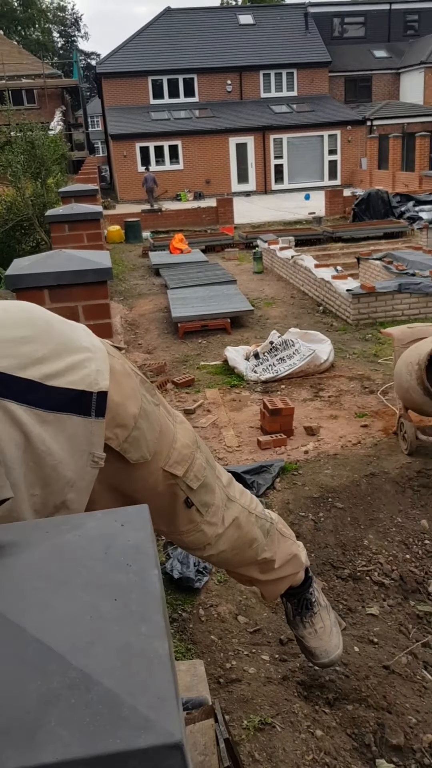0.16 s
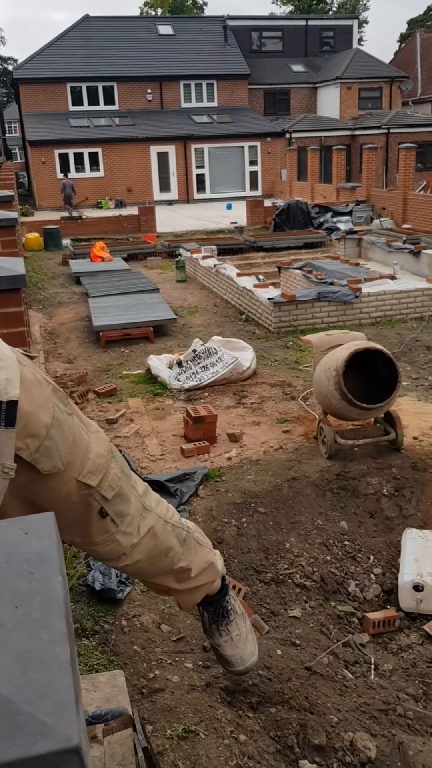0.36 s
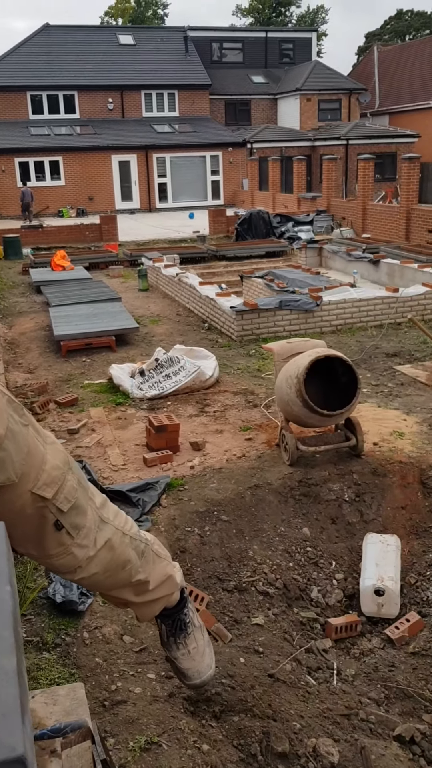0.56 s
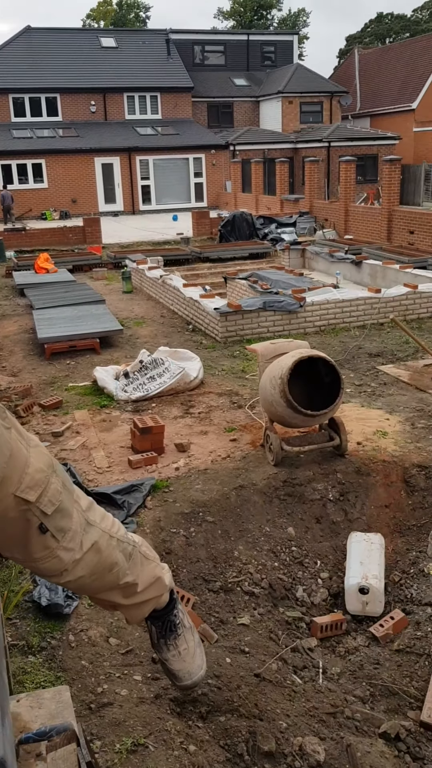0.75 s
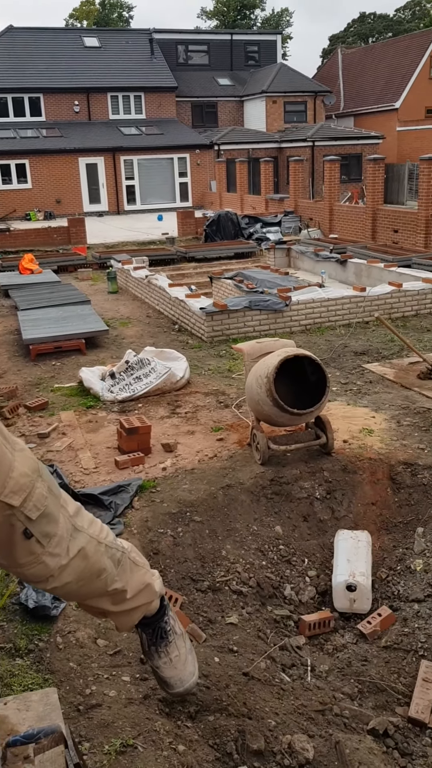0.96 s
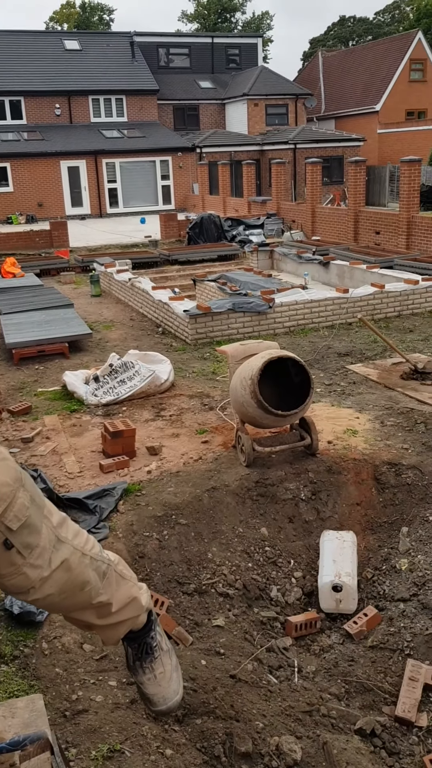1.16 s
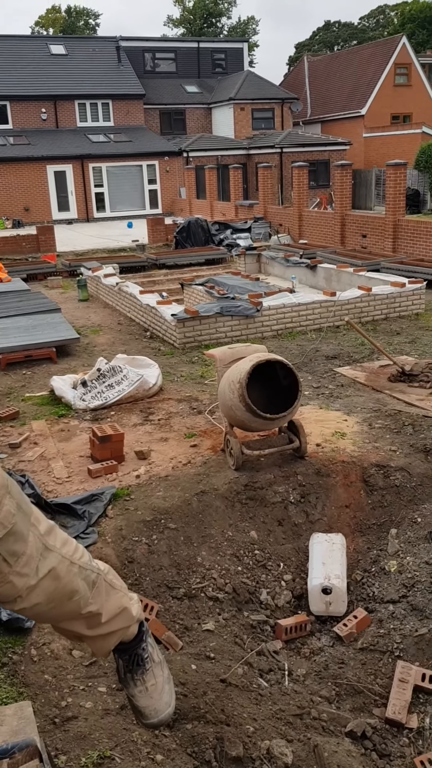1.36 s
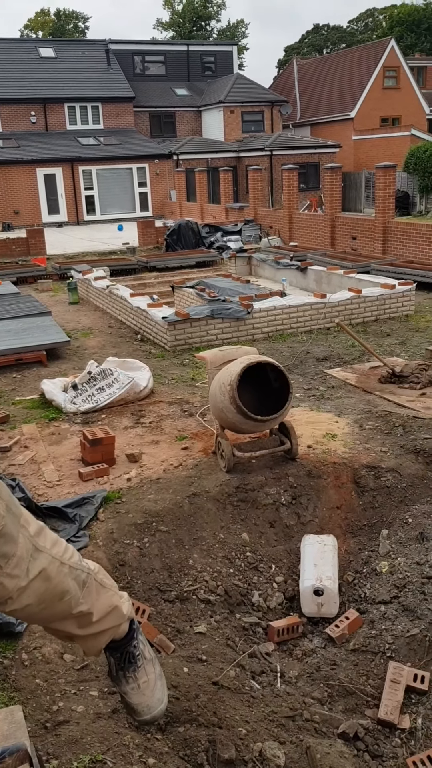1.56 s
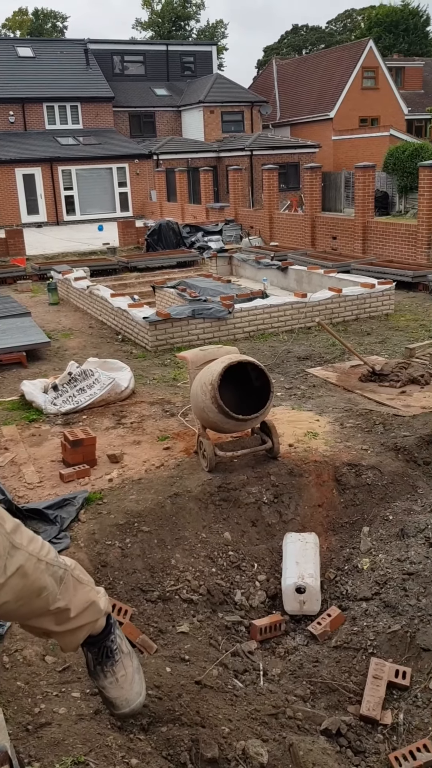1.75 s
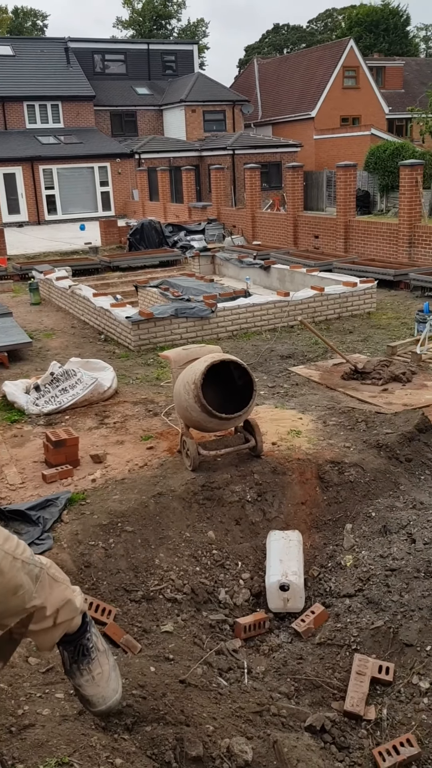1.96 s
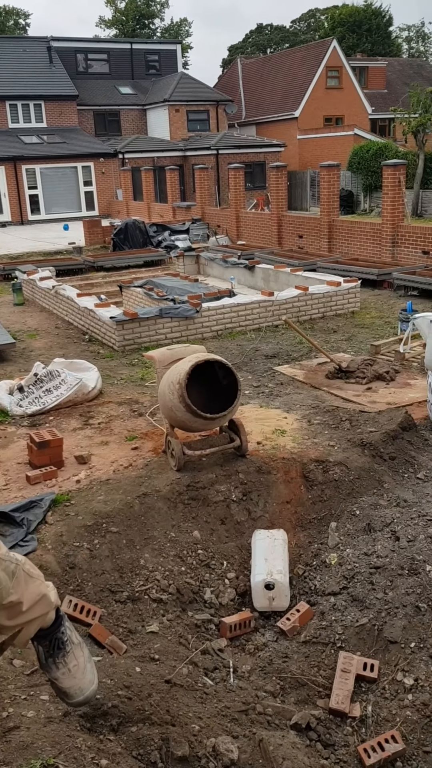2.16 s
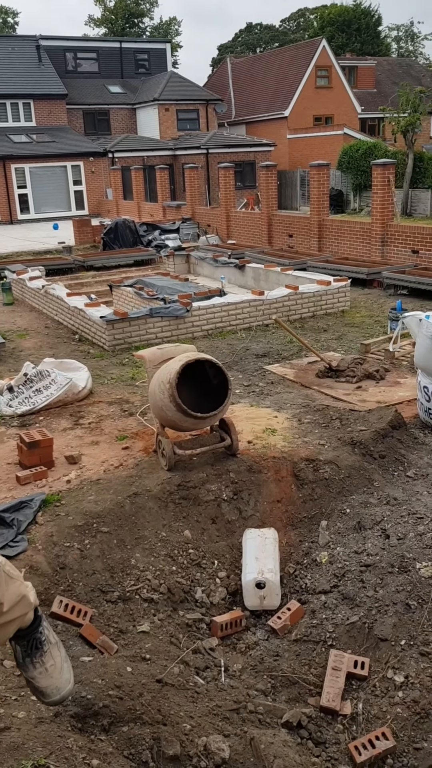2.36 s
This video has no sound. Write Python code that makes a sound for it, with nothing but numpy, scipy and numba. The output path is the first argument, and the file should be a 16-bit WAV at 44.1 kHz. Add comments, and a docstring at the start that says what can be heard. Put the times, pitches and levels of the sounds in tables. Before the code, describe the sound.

A rough stone slab scrapes and catches on a brick pillar, followed by faint rubs and taps

```python
"""One long gritty scrape of a concrete cap on a brick pillar swells and catches, close to the microphone.
A gloved hand works the cap: a touch comes before the scrape, soft rubs and small knocks follow it.
Cracking sand grains are random clicks, filtered into rasp, hiss and grinding; they also ring the slab's edge.
House fronts add a faint echo, made of fading noise. Behind lie a low outdoor rumble of filtered noise
and a thin, high, far whistle like a small bird's, made of wavering sine tones."""
import sys
import numpy as np
from scipy import signal
from scipy.fft import rfft, irfft
from scipy.io import wavfile
from numba import njit

SR = 44100
rng = np.random.default_rng(int(sys.argv[2]) if len(sys.argv) > 2 else 0)


def persist_wave(psi):
    """Save psi, clipped to +-1, as 16-bit WAV."""
    counts = np.round(np.clip(psi, -1, 1) * 32767).astype(np.int16)
    wavfile.write(sys.argv[1], SR, np.atleast_2d(counts).T)


N = 110250  # samples: 2.5 s

# Course of the long scrape, each layer before its trim below:
# time_s, edge_db, rasp_db, hiss_db, grinding_db
SCRAPE_LEVELS = [(0.245, -67, -76, -72, -79), (0.267, -70, -60, -58.5, -61), (0.309, -57, -50, -52, -55.5),
                 (0.341, -67, -50, -57, -64), (0.401, -51.5, -47, -50.5, -46),
                 (0.483, -50.5, -43, -45.5, -58), (0.521, -46, -44, -46.5, -53),
                 (0.533, -51, -39.5, -44, -58), (0.563, -38, -43.5, -46.5, -59),
                 (0.647, -46, -51, -48, -53.5), (0.72, -69.5, -74, -68, -65.5)]
EDGE_TRIM_DB, RASP_TRIM_DB, HISS_TRIM_DB, GRINDING_TRIM_DB = 3, 1.5, 0.5, 5
# Centre of the rasp, which rises with the speed of the slide: time_s, centre_hz
RASP_PITCH = [(.28, 3800), (.37, 3750), (.46, 3940), (.535, 4230), (.6, 4190), (.68, 4220)]
RASP_WIDTH_HZ = 1070.0
# Ways the slab's edge can ring, relative levels: pitch_hz, level_db, fade_by_60_db_s
EDGE_MODES = [(1320, -24, 0.064), (2170, -27, 0.058), (2477, -13, 0.067), (2620, -12, 0.082),
              (2743, -2, 0.057), (2700, -8.5, 0.085), (2890, -9, 0.036), (3130, -9, 0.031),
              (3970, -37, 0.16), (4000, -56, .06), (4840, -20, 0.05), (7740, -22, .015)]

# Tone colours of the grit, relative levels: pitch_hz, level_db
GRINDING_COLOUR = [(150, -29), (400, -1), (900, -2.5), (1500, -1), (2100, -2.5), (3200, 5), (4500, -5),
                   (5700, -10.5), (6400, -33), (16000, -35)]  # broad grinding
HISS_COLOUR = [(1500, -10), (4000, -5), (5600, 2), (6500, -0.5), (7500, 8.5), (8300, -4), (9300, -1),
               (12000, 2.5), (13500, -0.5), (16000, -4)]  # fine hiss
THUD_COLOUR = [(60, -10), (130, -12.5), (350, 4.5), (600, -1.5), (950, -3), (1170, 2), (1400, -8),
               (1800, -7.5), (3500, -55), (16000, -76)]  # dull thud or low brush
CRACK_COLOUR = [(300, -91), (1500, 6.5), (2300, -3), (3300, 5), (4400, 3.5), (5400, -2.5), (6400, -25),
                (16000, -62)]  # crack or rasp of a rub or knock

# Soft rubs of the glove: start_s, length_s, brush_db, edge_db, rasp_db, hiss_db
RUB_STROKES = [(1.223, 0.056, -62, -74, -59.5, -64), (1.3, 0.043, -64.5, -82, -67.5, -74),
               (1.569, 0.065, -60, -53.5, -60, -65), (1.647, 0.071, -63, -66, -63.5, -73),
               (1.72, 0.095, -77, -111, -74.5, -66.5), (2.239, 0.02, -78, -73, -67.5, -72.5),
               (2.366, 0.011, -59, -93, -66, -68.5)]
RUB_ATTACK_S, RUB_RELEASE_S = 0.0087, 0.053
# Knocks and catches, crack before its trim below:
# start_s, fade_by_60_db_s, thud_db, edge_db, crack_db, hiss_db, tick_pitch_hz
KNOCK_EVENTS = [(0.0437, 0.041, -44.5, -68, -65.5, -92, 4300), (.2262, 0.086, -46.5, -54, -42.5, -46, 4040),
                (.469, 0.015, -65, -55, -50, -40, 4280), (.4785, 0.018, -67, -41, -29, -51, 4150),
                (.5328, 0.016, -63.5, -53, -31, -54, 4430), (0.5352, 0.014, -75, -24.5, -46, -53, 4300),
                (.5425, 0.032, -68, -50, -30.5, -54, 4100), (0.5532, 0.028, -69, -31, -32, -66, 2450),
                (0.5701, 0.014, -50, -34, -33, -54, 2500), (0.591, 0.024, -76, -58, -54, -38.5, 4200),
                (0.63, 0.032, -59, -44, -48, -46, 4160), (1.203, 0.1, -45.5, -65, -53.5, -65, 4400),
                (1.2484, 0.078, -47, -76, -56, -70, 4700), (1.298, .05, -45, -66, -55.5, -55.5, 4560),
                (1.3255, 0.031, -70, -58, -55, -72, 2400), (1.4465, 0.024, -64, -76, -57, -80, 4400),
                (1.5821, 0.057, -45, -59, -53.5, -68, 3000),
                (1.7137, 0.062, -44.5, -47.5, -46.5, -68, 2870), (1.732, 0.1, -67, -70, -53.5, -50.5, 4350),
                (2.229, 0.069, -59, -71, -52, -61.5, 3150), (2.261, 0.026, -73, -72, -56, -72, 3100),
                (2.385, 0.026, -58, -74, -59, -68, 4580)]
KNOCK_ATTACK_S, TICK_WIDTH_HZ, CRACK_TRIM_DB = 0.00084, 480.0, -4.5

GRAINS_PER_S, GRAIN_SPREAD_DB = 6500, 2.5
JUDDER_STEPS_PER_S, JUDDER_DB = 170.9, 1.45
# Share of the power that reaches both microphone ports alike, 0 to 1
GRIT_SHARED, EDGE_SHARED = 0.33, 0.57

# Left minus right for sounds at the pillar: pitch_hz, difference_db
PILLAR_BALANCE = [(100, -32), (800, 8.5), (1300, -5), (2000, 1), (2750, 1), (4100, 2), (5100, -11.5),
                  (5800, -16), (6500, 4.5), (7500, -1.5), (8800, 16), (10200, 9), (12400, 6), (14500, 12.5),
                  (16000, 21)]
# Tone of the echo: pitch_hz, level_db
ECHO_TONE = [(100, -30), (600, 11), (1800, 8), (2700, -1.5), (5000, 3), (16000, 0)]
ECHO_FADE_BY_60_DB_S, ECHO_DB, LEFT_LAG_S = 0.76, -19.5, 0.0004645

# Notes of the far whistle: start_s, length_s, first_pitch_hz, last_pitch_hz, level_db
WHISTLE_NOTES = [(1.277, 0.18, 8100, 7850, -76), (1.44, 0.09, 8100, 7900, -79),
                 (1.516, 0.13, 7900, 7600, -70.5), (1.76, 0.14, 7950, 7900, -82),
                 (2.275, 0.11, 4500, 4670, -75)]
WHISTLE_WAVER, WHISTLE_FLUTTER_DB = 0.014, 4.5  # waver is a fraction of the pitch

# Tone of the outdoor rumble, relative levels: pitch_hz, level_db
OUTDOOR_COLOUR = [(15, -37), (25, -8), (49, 2), (62, -2), (82, -4.5), (113, -0.5), (173, -10), (198, -9.5),
                  (289, -8), (322, -10), (421, -15.5), (495, -14.5), (537, -18.5), (666, -17.5),
                  (804, -15.5), (919, -18.5), (997, -17.5), (1200, -18.5), (1620, -26.5), (2300, -41),
                  (5280, -39), (7500, -50.5), (15500, -42)]
# How much of the rumble differs between left and right: pitch_hz, side_to_mid_db
OUTDOOR_SIDE = [(30, -22), (100, -18), (300, -14), (700, -8), (1400, -4), (4000, 2), (16000, -1)]
OUTDOOR_DB, OUTDOOR_PAN_DB = -52, 1.7
TOP_HZ = 15800


def scrape():
    """The slab slides and judders: cracking grit gives rasp, hiss and grinding, and rings the edge."""
    t = times()
    first_s, last_s = SCRAPE_LEVELS[0][0], SCRAPE_LEVELS[-1][0]
    fade_in = np.clip((t - first_s) / .005, 0, 1)
    fade_out = np.exp(-np.maximum(t - last_s, 0) / .02)
    force = fade_in * fade_out * judder()
    edge_level, rasp_level, hiss_level, grinding_level = (
        force * undb(curve(SCRAPE_LEVELS, column)) for column in range(1, 5))

    centre = curve(RASP_PITCH)
    rasp = band_pass(band_pass(grit(), centre, RASP_WIDTH_HZ), centre, RASP_WIDTH_HZ)
    return (undb(EDGE_TRIM_DB) * edge(edge_level * grit(EDGE_SHARED))
            + undb(RASP_TRIM_DB) * rasp_level * unit(rasp)
            + undb(GRINDING_TRIM_DB) * grinding_level * coloured_grit(GRINDING_COLOUR)
            + undb(HISS_TRIM_DB) * hiss_level * coloured_grit(HISS_COLOUR))


def rubs():
    """Short strokes of the glove press the grit softly: attack, hold, release, with a slight judder."""
    t, envelopes = times(), 0
    for start, length, *levels_db in RUB_STROKES:
        attack = np.clip((t - start) / RUB_ATTACK_S, 0, 1)
        release = np.exp(-np.maximum(t - start - length, 0) / RUB_RELEASE_S)
        envelopes = envelopes + undb(levels_db)[:, None] * attack * release
    return contact(*envelopes) * judder()


def knocks():
    """Each knock or catch crushes a quickly fading burst of grit and ticks at its own pitch."""
    t, envelopes = times(), 0
    tick_pitch = np.full(N, float(KNOCK_EVENTS[0][-1]))
    for start, fade_s, *levels_db, pitch_hz in KNOCK_EVENTS:
        age = np.maximum(t - start, 0)
        shape = np.minimum(age / KNOCK_ATTACK_S, 1) * undb(-60 * age / fade_s)
        envelopes = envelopes + undb(levels_db)[:, None] * shape
        tick_pitch = np.where(t >= start, pitch_hz, tick_pitch)  # held until the next knock
    thud, edge_level, crack, hiss = envelopes
    tick = unit(band_pass(grit(), tick_pitch, TICK_WIDTH_HZ))
    return contact(thud, edge_level, undb(CRACK_TRIM_DB) * crack, hiss) + crack * tick


def contact(thud, edge_level, crack, hiss):
    """Pressed grit sounds in four layers: dull thud, ringing edge, crack and fine hiss."""
    return (thud * coloured_grit(THUD_COLOUR)
            + edge(edge_level * grit(EDGE_SHARED))
            + crack * coloured_grit(CRACK_COLOUR)
            + hiss * coloured_grit(HISS_COLOUR))


def edge(force):
    """The slab's edge, struck by grains, rings as a sum of fading sine tones."""
    t = times()[:SR // 4]
    response = 0
    for pitch_hz, level_db, fade_s in EDGE_MODES:
        response = response + undb(level_db - 60 * t / fade_s) * np.sin(2 * np.pi * pitch_hz * t)
    return ring(force, unit_energy(response))


def grit(shared=GRIT_SHARED):
    """Sand grains break in dense random clicks of uneven size, partly shared by the two ports."""
    hit = rng.random((3, N)) < GRAINS_PER_S / SR
    size = undb(GRAIN_SPREAD_DB * np.minimum(rng.exponential(size=(3, N)), 4))
    clicks = hit * size * rng.standard_normal((3, N))
    common, separate = clicks[0], clicks[1:]
    return unit(np.sqrt(shared) * common + np.sqrt(1 - shared) * separate)


def coloured_grit(points):
    """Fresh grit filtered to a tone colour, at an average level of 1."""
    return unit(colour(grit(), points))


def judder():
    """The rubbing force trembles at random, heard as a small rough change of level."""
    return undb(JUDDER_DB * walk(JUDDER_STEPS_PER_S))


def place(pillar):
    """Sound reaches the right port before the left; the house fronts return a faint echo."""
    tails = np.array([echo_tail(), echo_tail()])
    echo = colour(ring(pillar, tails), ECHO_TONE)
    lag = np.exp(-2j * np.pi * bin_hz() * LEFT_LAG_S)
    lean = np.sqrt(gains(PILLAR_BALANCE))  # half of the difference on each side
    return irfft(rfft(pillar + undb(ECHO_DB) * echo) * np.array([lag * lean, 1 / lean]), N)


def echo_tail():
    """Many reflections arrive as a fading spray of random noise."""
    return unit_energy(rng.standard_normal(N) * undb(-60 * times() / ECHO_FADE_BY_60_DB_S))


def whistle(pan_db=6):
    """Thin sine notes waver and glide in pitch while their level flutters."""
    notes, waver = 0, 1 + WHISTLE_WAVER * walk(440)
    for start, length, first_hz, last_hz, level_db in WHISTLE_NOTES:
        part = np.clip((times() - start) / length, 0, 1)
        pitch = (first_hz + (last_hz - first_hz) * part) * waver
        tone = np.sin(2 * np.pi * np.cumsum(pitch) / SR)
        notes = notes + undb(level_db) * np.sin(np.pi * part) * tone
    return notes * undb(WHISTLE_FLUTTER_DB * walk(70)) * pan(pan_db)


def outdoors():
    """Steady far rumble of noise, nearly alike on both sides in the bass and more diffuse above."""
    mid = unit(colour(rng.standard_normal(N), OUTDOOR_COLOUR))
    side = unit(colour(rng.standard_normal(N), OUTDOOR_COLOUR))
    side = colour(side, OUTDOOR_SIDE)
    return undb(OUTDOOR_DB) * np.array([mid + side, mid - side]) * pan(OUTDOOR_PAN_DB)


def pan(left_minus_right_db):
    """Gains that lean a sound to the left."""
    return undb(np.array([[left_minus_right_db], [-left_minus_right_db]]) / 2)


def undb(db):
    """Decibels to a plain gain."""
    return 10 ** (np.asarray(db) / 20)


def unit(x):
    """Scale to an average (RMS) level of 1."""
    return x / np.sqrt(np.mean(x ** 2))


def unit_energy(response):
    """Scale so that the squares add up to 1."""
    return response / np.sqrt(np.sum(response ** 2))


def times():
    """Time of every sample in seconds."""
    return np.arange(N) / SR


def bin_hz():
    """Frequency of every spectrum bin in Hz."""
    return np.arange(N // 2 + 1) * SR / N


def curve(table, column=1):
    """A table column joined by straight lines in time."""
    rows = np.array(table)
    return np.interp(times(), rows[:, 0], rows[:, column])


def gains(points):
    """Gain at each frequency, joined in dB along a logarithmic pitch scale."""
    hz, db = np.array(points).T
    return undb(np.interp(np.log(bin_hz() + 1), np.log(hz), db))  # +1 avoids log of zero


def colour(x, points):
    """Filter a sound to a tone colour."""
    return irfft(rfft(x) * gains(points), N)


def ring(x, response):
    """Let every moment of a sound set off the response."""
    return signal.fftconvolve(x, np.atleast_2d(response), axes=1)[:, :N]


def walk(steps_per_s):
    """Random wander with a spread of 1: random points joined by straight lines."""
    points = rng.standard_normal(4096)
    return unit(np.interp(times() * steps_per_s, np.arange(len(points)), points))


def band_pass(sides, centre, width_hz):
    """Send each side through the moving resonance."""
    return np.array([resonance(side, centre, width_hz) for side in sides])


@njit
def resonance(x, centre_hz, width_hz):
    """Two linked stores swap energy and pass a band around a moving centre."""
    out, band, low = np.empty(len(x)), 0., 0.
    for i in range(len(x)):
        g = np.tan(np.pi * centre_hz[i] / SR)
        damping = width_hz / centre_hz[i]
        v = (band + g * (x[i] - low)) / (1 + g * (g + damping))
        band = 2 * v - band
        low = low + 2 * g * v
        out[i] = damping * v
    return out


def scene():
    """The pillar sounds with their echo, over the whistle and the outdoor rumble."""
    return place(scrape() + rubs() + knocks()) + whistle() + outdoors()


def record(dry):
    """The recorder cuts the deepest bass and the top."""
    bass_cut = signal.butter(6, 36, "highpass", fs=SR, output="sos")
    top_cut = signal.ellip(10, .2, 80, TOP_HZ, fs=SR, output="sos")
    return signal.sosfilt(top_cut, signal.sosfilt(bass_cut, dry))


dry = scene()
out = record(dry)
persist_wave(out)
```